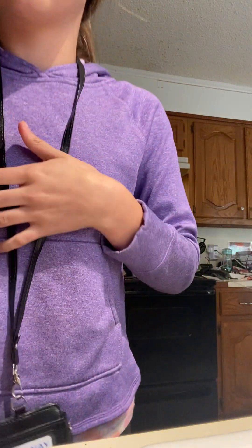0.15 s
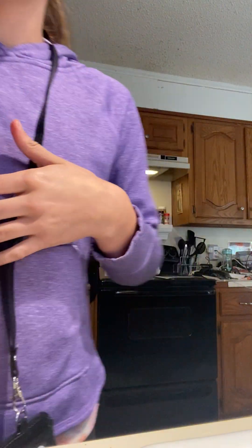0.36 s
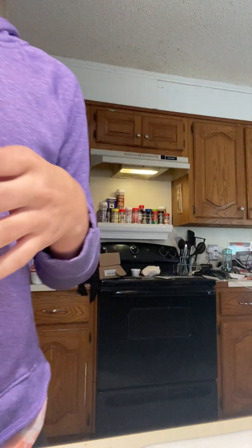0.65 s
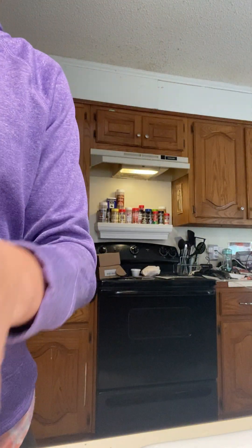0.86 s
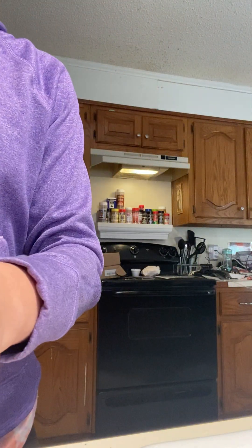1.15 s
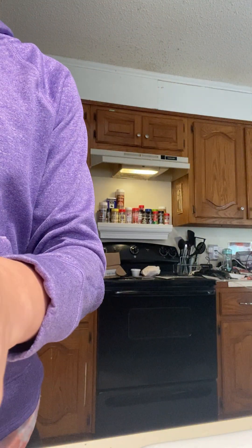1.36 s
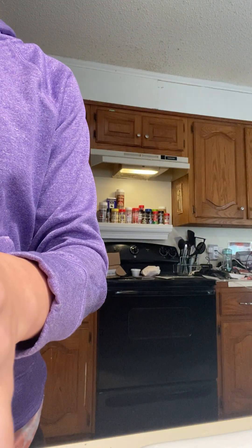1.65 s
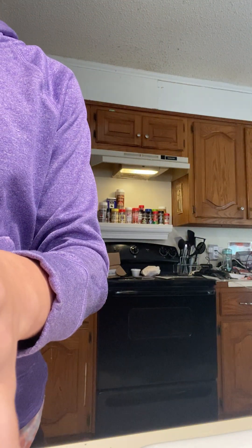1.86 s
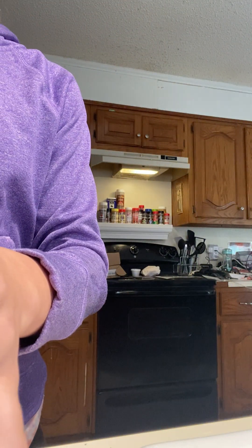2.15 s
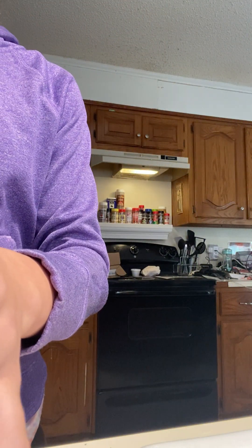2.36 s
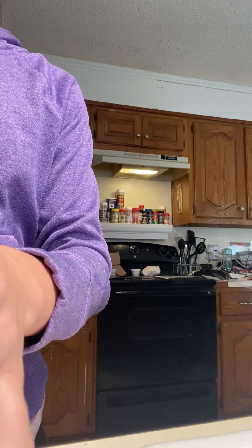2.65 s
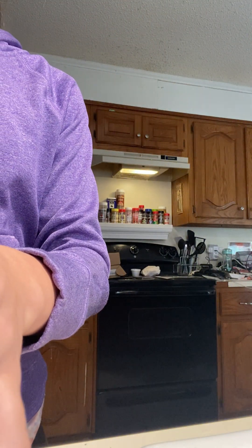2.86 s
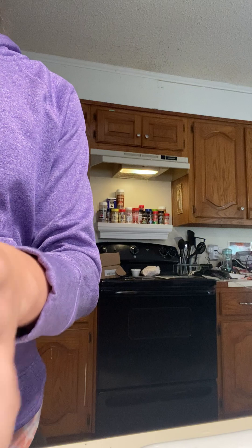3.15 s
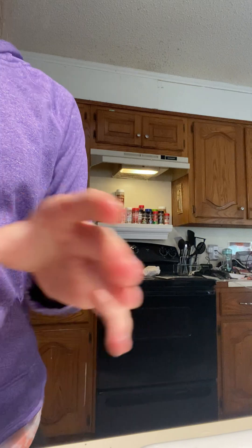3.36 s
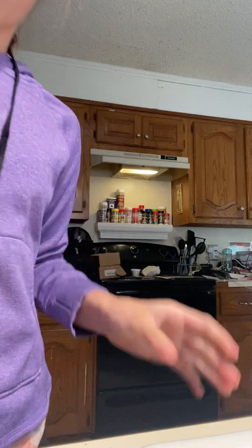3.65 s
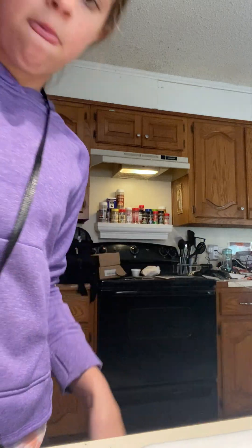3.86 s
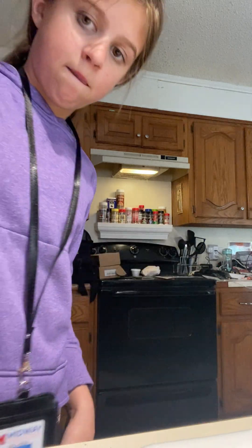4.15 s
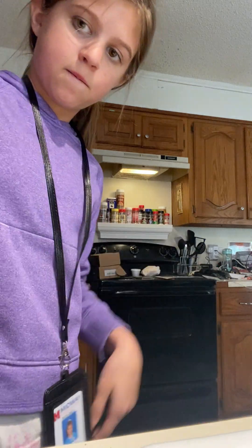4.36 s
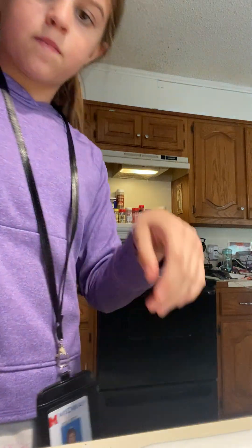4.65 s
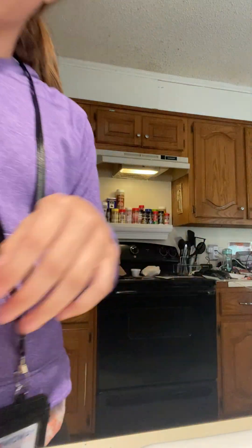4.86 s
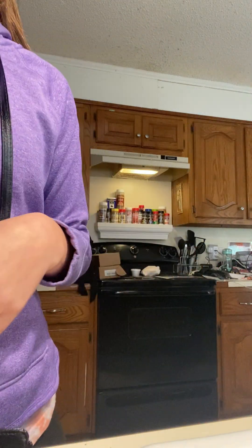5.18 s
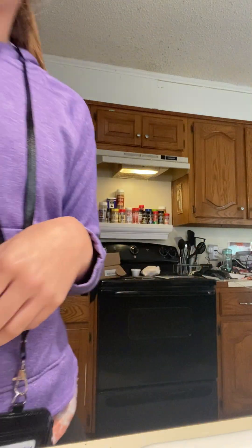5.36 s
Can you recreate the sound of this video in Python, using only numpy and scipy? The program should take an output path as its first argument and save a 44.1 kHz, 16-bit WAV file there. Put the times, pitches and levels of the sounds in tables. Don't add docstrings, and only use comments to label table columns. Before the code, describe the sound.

Close, uneven bursts of ice knocking and ringing against a glass, with hollow thuds, counter thumps and a faint appliance hum behind.

```python
import sys
import numpy as np
from scipy import signal
from scipy.fft import rfft, irfft, next_fast_len
from scipy.io import wavfile
from scipy.ndimage import uniform_filter1d

SR = 44100
rng = np.random.default_rng(int(sys.argv[2]) if len(sys.argv) > 2 else 0)


def voltage_ratio(decibels):
    exponent = np.asarray(decibels, float) / 20
    return 10 ** exponent


def waveform_to_disk(signal):
    frames = np.transpose(np.atleast_2d(signal))
    scaled = np.clip(frames, -1, 1) * 32767
    samples = np.round(scaled).astype(np.int16)
    wavfile.write(sys.argv[1], SR, samples)


N = 243299

# t/s, peak level/dB, f/Hz
KNOCKS = [(0.2143, -31, 1810), (0.5003, -26, 2120), (0.5320, -15.5, 2290), (0.7317, -27.5, 1760),
          (0.7636, -8, 2450), (0.9702, -8.5, 2270), (0.9856, -10.5, 2310), (1.0187, -17.5, 2560),
          (1.0873, -18, 2460), (1.1453, -24, 1790), (1.2208, -13, 2530), (1.518, -28, 2100),
          (1.5405, -18.5, 2164), (1.8298, -32, 3170), (1.9721, -18.5, 2060), (2.5225, -21.5, 3040),
          (2.7636, -20.5, 2590), (2.83, -23.5, 2160), (3.008, -32, 2480), (3.0357, -27, 2520),
          (3.437, -37.5, 2260), (3.5771, -18, 1780), (3.6372, -22.5, 2160), (3.6994, -6.5, 2546),
          (3.8175, -14.5, 2250), (3.8638, -15.5, 3010), (3.8907, -14, 2725), (4.0153, -24.5, 1920),
          (5.0804, -19.5, 2025), (5.236, -38, 2400)]
# t/s, peak level/dB
TAPS = [(0.4946, -25), (0.5834, -34.5), (0.7412, -25.5), (0.8041, -18), (0.85, -28), (0.9094, -30),
        (0.955, -13.5), (0.997, -25.5), (1.0254, -22.5), (1.0524, -16), (1.1104, -22.5), (1.1859, -20),
        (1.4767, -17.5), (1.4985, -25), (1.7287, -36), (1.766, -31.5), (1.9491, -16.5), (2.5448, -17),
        (2.5704, -15), (2.7132, -21.5), (2.736, -9.5), (3.0645, -17.5), (3.12, -32), (3.1763, -32.5),
        (3.31, -32), (3.3615, -25.5), (3.5762, -9), (4.0473, -12.5), (4.2158, -32.5), (5.058, -21.5)]
# t/s, belly ring level/dB, rim ring level/dB, chip level/dB
CLINKS = [(0.4071, -29, -10.5, -26), (0.466, -37.5, -22, -29), (0.7382, -44.5, -33, -37.5),
          (0.948, -25, -49.5, -24), (0.9665, -20.5, -26.5, -37), (1.0495, -37.5, -51.5, -36.5),
          (1.1206, -25, -31.5, -40.5), (1.4528, -60, -38, -28.5), (1.8269, -56, -40, -28),
          (1.907, -44, -44, -41), (1.972, -40, -62.5, -18.5), (2.3095, -67.5, -37, -16),
          (2.362, -36.5, -37.5, -23), (2.522, -34, -37, -21), (2.7044, -52.5, -34, -30),
          (2.9975, -34, -13.5, -28.5), (3.0621, -26, -20.5, -43), (3.3341, -50.5, -66.5, -29),
          (3.403, -61.5, -56, -30), (3.5645, -71, -20, -14.5), (3.701, -55, -51.5, -27),
          (3.8176, -36.5, -57, -36.5), (3.9082, -55, -41, -26), (4.0222, -58, -24.5, -41.5),
          (4.049, -54, -33.5, -30), (4.7155, -38, -23, -34), (5.0951, -33, -18.5, -24),
          (5.2278, -42, -28, -24), (5.3439, -27, -23.5, -21), (5.4277, -34, -24.5, -25.5)]
# t/s, crunch level/dB, hollow level/dB, counter level/dB, length/s
TUMBLES = [(0.396, -41.5, -40.5, -41.5, 0.035), (0.484, -38, -34.5, -34, 0.072),
           (0.532, -38.5, -27.5, -39, 0.027), (0.721, -32, -23, -30, 0.056),
           (0.899, -35, -20.5, -33, 0.053), (0.955, -22, -12, -28, 0.022),
           (1.032, -35, -27.5, -46.5, 0.041), (1.088, -28, -14, -47.5, 0.0055),
           (1.104, -34, -25, -35.5, 0.055), (1.173, -35, -22, -57, 0.06), (1.206, -45.5, -35.5, -41, 0.084),
           (1.4345, -35, -28.5, -40, 0.1), (1.482, -48.5, -20, -55.5, 0.064),
           (1.922, -39.5, -28, -44.5, 0.012), (1.939, -25.5, -17.5, -33.5, 0.033),
           (2.308, -29, -30.5, -40.5, 0.016), (2.508, -28, -19.5, -31.5, 0.049),
           (2.7123, -27.5, -25, -44, 0.043), (3.059, -30.5, -22.5, -35.5, 0.056),
           (3.546, -47, -34.5, -45.5, 0.015), (3.561, -30, -17.5, -29, 0.037),
           (3.613, -39.5, -28, -33, 0.054), (3.8846, -34, -22.5, -44, 0.0077),
           (4.0118, -34.5, -30, -68, 0.0071), (5.052, -32, -28.5, -35, 0.025),
           (5.35, -32, -33.5, -42, 0.017)]
# f/Hz, level/dB
CRUNCH = [(800, -9), (1500, -18.5), (3000, -13), (5000, -5.5), (7000, -16), (10500, -16), (12500, -18.5),
          (15500, -27), (17000, -63.5)]

WALL_HZ = 2290
GRIPPED_S, GRIP_DB = 2.2, -13


def unit(x):
    return x / np.sqrt(np.mean(x ** 2) + 1e-20)


def along(points, hz):
    f, v = np.transpose(points)
    return np.interp(np.log(hz + 1), np.log(f + 1), v)


def filtered(x, response):
    m = next_fast_len(N + SR // 2)
    return irfft(rfft(x, m) * response(np.fft.rfftfreq(m, 1 / SR)), m)[..., :N]


def resonances(modes):
    def response(f):
        total = 0
        for k, (centre, width, db) in enumerate(modes):
            loss = 1j * f * width
            total = total + (-1) ** k * voltage_ratio(db) * loss / (centre * centre - f * f + loss)
        return total
    return response


def blank(seconds_part):
    return np.zeros(N + SR), np.arange(SR // seconds_part) / SR


def add(out, s, sound):
    out[round(s * SR):][:len(sound)] += sound


def ring(hz, db, t60, rise, t):
    return voltage_ratio(db - 60 * t / t60) * np.sin(2 * np.pi * hz * t) * (1 - np.exp(-t / rise))


def chippings():
    # t/s, peak level/dB
    cracked = [(0.2154, -34), (0.2875, -46.5), (0.4013, -32), (0.4988, -21.5), (1.407, -46), (0.5835, -38),
               (0.7726, -35), (0.85, -38.5), (0.91, -43.5), (1.1, -26.5), (1.1505, -33), (1.0904, -30.5),
               (1.4451, -32), (1.5439, -31.5), (1.9, -36.5), (1.9285, -31), (1.9435, -29), (2.2895, -44),
               (3.3, -33), (2.6105, -29), (1.2, -34), (4.525, -60.5), (3.26, -50), (2.875, -53.5),
               (3, -26.5), (3.0914, -15), (3.081, -26.5), (1.640, -54), (1.652, -46), (4.30, -58),
               (4.43, -63), (1.516, -31), (1.372, -49), (3.4348, -40.5), (3.683, -32.5), (5.0609, -26.5)]
    return cracked + [(s, chip_db) for s, _, _, chip_db in CLINKS]


def knocks():
    # t/s, peak level/dB, f/Hz
    nicks = [(0.4025, -36, 2150), (0.4105, -32, 2180), (0.4648, -40.5, 2170), (0.8829, -33, 1640),
             (0.9484, -8, 2310), (1.2999, -31.5, 2260), (1.3872, -36, 2350), (1.4524, -19.5, 2370),
             (1.7499, -32, 2330), (1.8622, -34, 2330), (1.9046, -38, 2570), (1.9284, -28.5, 2140),
             (2.3096, -25, 2210), (2.3444, -31, 1390), (2.379, -33, 2310), (2.4977, -28.5, 2350),
             (2.5326, -17.5, 2290), (2.6304, -22, 1350), (2.8784, -32.5, 2160), (3.014, -36, 2490),
             (3.1617, -27, 2210), (3.3318, -27.5, 3400), (3.4047, -37, 2290), (3.5528, -27, 2290),
             (3.6114, -23, 2300), (3.6621, -26, 2280), (3.7424, -35.5, 2200), (3.9609, -38.5, 2960),
             (4.4064, -42.5, 2297), (4.4199, -40.5, 1300), (5.1307, -30.5, 1920), (5.1701, -33, 2900),
             (5.23, -30, 2350), (5.2464, -45, 2520), (5.3448, -29, 2180), (5.4251, -26, 2310)]
    snap_db = -8
    blows = KNOCKS + [(s, db, WALL_HZ) for s, db in TAPS]
    blows = blows + [(s, db - 11, WALL_HZ) for s, db in chippings()]
    blows = blows + [(s, db - 5.5, hz) for s, db, hz in nicks]
    neighbours = [(.75, -2, .012), (1.02, -19, .035), (1.18, -3, .012), (1.36, -6, .009)]  # ratio, dB, t60 s
    out, t = blank(16)
    for (s, db, hz), luck in zip(blows, rng.standard_normal((len(blows), 4))):
        life = 0.87 ** (s > GRIPPED_S)
        add(out, s, ring(hz, db + 1.0, 0.017 * life, 0.00036, t))
        add(out, s, ring(1.9 * hz, db + snap_db, 0.0019, 0.000081, t))
        add(out, s, ring(.55 * hz, db + snap_db, 0.015, 0.00068, t))
        for (ratio, side_db, t60), u in zip(neighbours, luck):
            add(out, s, ring(hz * ratio * (1 + 0.11 * u), db + side_db, t60, 0.00055, t))
    return out[:N]


def taps():
    after_rings = [(s, db - 0.026 * abs(hz - WALL_HZ)) for s, db, hz in KNOCKS]
    out, t = blank(6)
    for s, db in after_rings + TAPS:
        add(out, s, ring(WALL_HZ, db - 9.5 + GRIP_DB * (s > GRIPPED_S), 0.058, 0.0011, t))
    return out[:N]


def flutter(size, depth):
    slow = uniform_filter1d(rng.standard_normal(size), size=180)
    return 1 + depth * unit(uniform_filter1d(slow, size=180))


def wall(blows, modes, linger_db):
    out, t = blank(5)
    touches = np.sort([row[0] for row in KNOCKS + TAPS])
    fade = np.cos(np.pi / 2 * t / t[-1])
    for (s, blow_db), luck in zip(blows, rng.standard_normal((len(blows), len(modes)))):
        swing_db = 5 * luck * (np.arange(len(modes)) > 0)
        touched = np.searchsorted(touches, s + t) - np.searchsorted(touches, s + 0.013)
        damping = voltage_ratio(-6.5 * uniform_filter1d(np.maximum(touched, 0.), size=200))
        waver = flutter(len(t), depth=.22)
        slow_db = blow_db + linger_db + GRIP_DB * (s > GRIPPED_S)
        add(out, s, waver * damping ** .1 * fade * ring(modes[0][0], slow_db, 0.24, 0.0052, t))
        life = np.exp(0.22 * luck[0])
        family = sum(ring(hz, blow_db + db + v, life * t60, 0.00091, t)
                     for (hz, db, t60), v in zip(modes, swing_db))
        add(out, s, damping * waver * family)
    return out[:N]


def belly_ring():
    # f/Hz, level/dB, t60/s
    belly_modes = [(5245, 0, .078), (5272, -9, .1), (5330, -12, .04), (4950, -13, .03), (4230, -11, .04),
                   (4080, -14, .03), (2620, -14, .04), (2210, -14, .04), (3590, -20, .04),
                   (2400, -16, .045)]
    clinked = [(s, db) for s, db, _, _ in CLINKS]
    grazed = [(s, db - 32) for s, db, *_ in TAPS + KNOCKS]
    return wall(clinked + grazed, belly_modes, linger_db=-9)


def rim_ring():
    # f/Hz, level/dB, t60/s
    rim_modes = [(9228, 0, .062), (9259, -7, .08), (9040, -12, .025), (14400, -20, .04), (6150, -20, .025),
                 (6350, -19, .04), (7000, -24, .03), (7750, -21, .04), (10500, -22, .04)]
    rebound_s, rebound_db = 0.0055, -1.5
    blows = [(s + k * rebound_s, db - 8 + k * rebound_db) for s, _, db, _ in CLINKS for k in range(2)]
    return wall(blows, rim_modes, linger_db=-16)


def pings():
    # t/s, peak level/dB, f/Hz
    facets = [(0.401, -28, 6000), (0.4993, -25, 5880), (0.5312, -34, 5570), (0.5454, -32.5, 5700),
              (0.7384, -28, 5400), (0.7704, -24, 5680), (0.9093, -42, 5800), (0.953, -15, 5400),
              (0.9687, -15, 5710), (1.0256, -26, 6030), (1.05, -21, 5600), (1.1221, -21.5, 5470),
              (1.4451, -36, 7600), (1.4541, -28, 5850), (1.5434, -28.5, 6000), (1.7634, -35, 6400),
              (1.8282, -31, 6160), (2.31, -22, 7020), (2.3214, -20, 6320), (2.3585, -25, 6000),
              (2.5197, -24, 5730), (2.7122, -31, 5920), (2.9975, -26, 6200), (3.0629, -30, 6090),
              (3.0916, -22, 5900), (3.1044, -19.5, 6310), (3.3318, -29, 5980), (3.4037, -31.5, 5420),
              (3.4348, -30, 4260), (3.5643, -22.5, 6630), (3.5774, -21.5, 5750), (3.6174, -27, 7100),
              (3.685, -35, 5770), (3.6985, -23.5, 5750), (3.8174, -29, 5870), (4.0228, -30.5, 6020),
              (4.0467, -31, 7780), (5.0609, -32.5, 6430), (5.2265, -28.5, 6240), (5.3446, -21.5, 5560),
              (5.424, -27.5, 7700)]
    out, t = blank(16)
    for s, db, hz in facets:
        add(out, s, ring(hz, db - 5, .02, 0.00024, t) + ring(1.07 * hz, db - 9, .02, .0006, t))
    return out[:N]


def sings():
    # t/s, level/dB, f/Hz, t60/s
    lone_modes = [(.403, -35, 2227, 0.089), (0.441, -42, 2290, 0.21), (.505, -26.5, 2290, 0.1),
                  (0.534, -27, 1510, 0.024), (.733, -23.5, 190, 0.14), (3.702, -28, 1360, 0.04),
                  (.805, -38.5, 5250, 0.096), (.856, -47.5, 5245, 0.14), (.935, -23, 2290, 0.057),
                  (0.973, -25, 1370, .04), (.985, -32, 9230, 0.05), (1.075, -31, 5245, 0.051),
                  (1.093, -32.5, 9230, 0.031), (1.226, -42, 5245, 0.13), (1.224, -13.5, 2494, 0.046),
                  (2.552, -37.5, 5250, 0.056), (3.005, -37, 5190, 0.17), (3.031, -29, 2500, .06),
                  (3.613, -28.5, 2310, 0.077), (3.703, -40, 5200, 0.071), (5.231, -32.5, 2368, 0.056),
                  (5.247, -40, 2570, 0.037), (.532, -18, 2324, 0.047), (.52, -44.5, 9230, 0.2),
                  (.954, -20, 2290, .05), (.970, -24, 2290, 0.044), (1.862, -50.5, 5260, 0.081),
                  (2.731, -16, 2327, 0.034), (2.999, -33.5, 2210, 0.07), (3.745, -29.5, 120, 0.066),
                  (3.570, -8, 2300, 0.014), (2.320, -23, 2200, 0.016)]
    out, t = blank(5)
    for s, db, hz, t60 in lone_modes:
        add(out, s, ring(hz, db + 1.5, t60, 0.0018, t))
    return out[:N]


def cracks():
    out, t = np.zeros((2, N + SR)), np.arange(SR // 16) / SR
    t60 = np.array([[0.043], [.022]])
    for s, db in chippings():
        puff = voltage_ratio(db + 6.5 - 60 * t / t60) * rng.standard_normal(len(t))
        add(out.T, s, puff.T)

    def colour(f):
        split = np.array([1 / (1 + (f / 15000) ** 6), (f / 15000) ** 4])
        return voltage_ratio(along(CRUNCH, f)) * f ** 2 / (f ** 2 + 3500 ** 2) * split
    return filtered(out[:, :N], colour).sum(axis=0)


def thuds():
    # t/s, peak level/dB, f/Hz
    base_blows = [(0.214, -34.5, 516), (0.53, -28, 541), (0.765, -21, 567), (0.851, -25, 782),
                  (0.929, -18, 676), (0.947, -12.5, 798), (0.978, -7, 931), (1.091, -27, 693),
                  (1.128, -32, 585), (1.189, -22, 676), (1.22, -16, 853), (1.447, -23, 573),
                  (1.501, -24, 620), (1.53, -49, 547), (1.554, -18, 586), (1.774, -23, 663),
                  (1.95, -16.5, 575), (2.534, -30, 495), (2.576, -23.5, 785), (2.737, -20, 599),
                  (3.065, -16.5, 559), (3.177, -23.5, 582), (3.312, -28.5, 667), (3.578, -14, 571.4),
                  (3.625, -20.5, 601), (3.699, -26, 593), (3.89, -21.5, 795), (4.016, -30.5, 808),
                  (5.066, -25.5, 613), (5.37, -25, 552)]
    # t/s, peak level/dB, f/Hz
    softer_base_blows = [(0.741, -25.5, 556), (0.911, -23, 750), (0.934, -16, 780), (1.099, -22, 703),
                         (2.344, -30.5, 1240), (2.514, -22, 712), (2.629, -34.5, 708), (2.764, -14, 576),
                         (3.089, -12, 570), (3.119, -24.5, 656), (3.163, -22, 569), (3.36, -28, 817),
                         (3.593, -19.5, 572), (3.665, -26.5, 687), (5.081, -20.5, 797)]
    softer = [(s, db - 8, hz) for s, db, hz in softer_base_blows]
    landings = [(s + .012, db - 12, 617) for s, _, db, _, _ in TUMBLES]
    out, t = blank(8)
    for s, db, hz in base_blows + softer + landings:
        add(out, s, ring(hz, db + 5.0, 0.047, 0.006, t) + ring(1.4 * hz, db + 3.5, 0.022, 0.0023, t))
    return out[:N]


def burst_gains():
    # t/s, crunch level/dB, hollow level/dB, length/s
    settlings = [(0.278, -61, -38.5, 0.032), (0.785, -32.5, -46.5, 0.012), (0.831, -43, -28.5, 0.03),
                 (1.341, -55.5, -42.5, 0.089), (1.632, -56, -54, 0.027), (1.716, -53.5, -38.5, 0.04),
                 (1.758, -31.5, -24, 0.0091), (1.802, -50, -45, 0.059), (2.166, -65.5, -57, 0.046),
                 (2.353, -46.5, -46, 0.026), (2.607, -45, -35, 0.02), (2.759, -48.5, -46.5, 0.087),
                 (3, -45, -46, 0.059), (3.153, -40.5, -23, 0.014), (3.192, -62.5, -55, 0.068),
                 (3.322, -45, -36, 0.039), (3.349, -51.5, -59.5, 0.014), (3.674, -40, -29, 0.054),
                 (3.765, -52.5, -64, 0.015), (3.798, -49, -34, 0.074), (4.283, -72, -44.5, 0.016),
                 (4.406, -53, -45, 0.016), (5.166, -53.5, -62, 0.04), (5.203, -48.5, -42.5, 0.024)]
    bursts = TUMBLES + [(s, c, h, h - 17, d) for s, c, h, d in settlings]
    gains, t = np.zeros((3, N + SR)), np.arange(SR // 3) / SR
    start = 1 - np.exp(-t / np.array([[.004], [.008], [.015]]))
    t60 = np.array([[.07], [.15], [.25]])
    for s, crunch_db, hollow_db, counter_db, length in bursts:
        after = np.maximum(t - length, 0)
        level_db = np.array([[crunch_db], [hollow_db], [counter_db]]) - 60 * after / t60
        add(gains.T, s, ((voltage_ratio(level_db) * start) ** 2).T)
    return np.sqrt(gains[:, :N])


def gravel(per_s, spread_db, wet):
    struck = rng.random(N) < per_s / SR
    hits = struck * voltage_ratio(spread_db * rng.standard_normal(N)) * np.sign(rng.standard_normal(N))
    return unit(hits) + wet * rng.standard_normal(N)


def splinters(count, cycles, spread_db):
    u, t = rng.random((count, 2)), np.arange(256)
    step = 2 * np.pi * 1000 * 16 ** u[:, :1] / SR
    decay_db = 60 * t * step / (2 * np.pi * cycles)
    rows = voltage_ratio(spread_db * rng.standard_normal((count, 1)) - decay_db) * np.sin(step * t) * step
    places = (u[:, 1:] * N).astype(int) + t
    return unit(np.bincount(places.ravel(), rows.ravel(), N + 256)[:N])


def grinding():
    # f/Hz, width/Hz, level/dB
    cube_modes = [(1540, 480, -15.5), (2120, 560, 0.5), (2310, 29, 9), (2530, 44, -4), (2910, 560, -1),
                  (5130, 9.9, -5.5), (9230, 20, -4.5)]
    # f/Hz, width/Hz, level/dB
    hollow_modes = [(572.5, 27, 0), (700.8, 28, -1), (822, 44, -8), (927, 65, -7.5), (1240, 340, -8.5)]
    # f/Hz, width/Hz, level/dB
    counter_modes = [(58.5, 12, 1), (86, 20, 2.5), (187.5, 37, 0), (286.2, 13, -1.5), (333.6, 4.9, -1.5)]
    crunch, hollow, counter = burst_gains()
    chips = splinters(count=16000, cycles=30, spread_db=4.5) + 0.5 * rng.standard_normal(N)
    grit = gravel(per_s=700, spread_db=4.5, wet=.45)
    bite = np.abs(uniform_filter1d(grit ** 2, size=160)) ** 0.36
    bright = voltage_ratio(-9.5) * unit(bite * filtered(chips, lambda f: voltage_ratio(along(CRUNCH, f))))
    cubes = voltage_ratio(4.0) * filtered(crunch * grit, resonances(cube_modes))

    def hollow_tone(f):
        return resonances(hollow_modes)(f) / (1 + 1j * f / 1500) ** 2
    slosh = np.array([gravel(per_s=400, spread_db=3.5, wet=.5) for _ in range(2)])
    dull, unlike = unit(filtered(slosh, hollow_tone))
    boom = unit(filtered(gravel(per_s=120, spread_db=3.0, wet=0.31), resonances(counter_modes)))
    grind = crunch * bright + cubes + voltage_ratio(-10.0) * hollow * dull
    return grind, voltage_ratio(-2.0) * counter * boom, voltage_ratio(-14.5) * hollow * unlike


def thumps():
    out, t = blank(4)
    for s, _, _, db, _ in TUMBLES:
        add(out, s + .015, ring(189, db - 1, 0.15, 0.0064, t))
    return out[:N]


def sleeve():
    # t/s, level/dB, length/s
    strokes = [
        (0.138, -69.5, 0.59),
        (4.368, -64, 0.082),
        (4.651, -64.5, 0.45),
        (5.16, -56, 0.062),
    ]
    # f/Hz, level/dB per Hz
    cloth = [(900, -1), (2500, -3), (6000, -10), (10000, -13), (12500, -39.5)]
    t, swell = np.arange(N) / SR, np.zeros(N)
    for s, db, length in strokes:
        stroke = np.sin(np.pi * np.clip((t - s) / length, 0, 1) ** 0.4)
        swell += voltage_ratio(db) * np.abs(stroke) ** 1.2
    return swell * unit(filtered(rng.standard_normal(N), lambda f: voltage_ratio(along(cloth, f))))


def middle(f):
    return 1 / (1 + (f / 5000) ** 6) / (1 + (160 / (f + 1)) ** 4)


def ports(x, lag_s):
    # f/Hz, lead/rad
    phase_lead = [(0, 0), (690, .1), (1120, -3), (1640, -8.9), (2150, -7.3), (2760, -8.7), (3360, -7.5),
                  (4220, -6.9), (7240, -6.5), (9130, -7.6), (10700, -8.1), (12300, -9.3), (16400, -9.5)]
    # f/Hz, left minus right level/dB
    side_lean = [(60, 1), (200, 4.5), (380, 8), (700, 6), (1290, 2), (2380, 6), (4400, 2.5), (8100, .5),
                 (11000, 0)]
    # t/s, left minus right level/dB
    place = [(0.0, -18), (0.18, 7.5), (2.7, 7), (3.8, 7), (4.15, 9), (4.41, 8.5), (5.52, 5.5)]

    def half(f):
        lead = np.interp(f, *np.transpose(phase_lead)) + 2 * np.pi * f * lag_s * middle(f)
        return voltage_ratio(along(side_lean, f) / 2) * np.exp(.5j * lead)
    pair = filtered(x, lambda f: np.array([half(f), 1 / half(f)]))
    pan_db = np.interp(np.arange(N) / SR, *np.transpose(place)) - 5
    shift = voltage_ratio(np.array([pan_db, -pan_db]) / 2) - 1
    return pair + filtered(pair, middle) * shift


def kitchen(x):
    # f/Hz, t60/s
    room_decay = [(200, 0.19), (1000, .3), (2400, 0.23), (5000, 0.24), (10000, 0.12), (13000, 0.06)]
    hz, t, z = signal.stft(rng.standard_normal((2, SR // 2)), SR, nperseg=256)
    z[1] = z[0] + middle(hz)[:, None] * (z[1] - z[0])
    decay = voltage_ratio(-60 * t / along(room_decay, hz)[:, None])
    tail = signal.istft(z * decay, SR, nperseg=256)[1]
    late = np.pad(x, (150, 0))[None]
    return signal.fftconvolve(late, tail / np.linalg.norm(tail[0]), axes=1)[:, :N]


def hum():
    # f/Hz, level/dB per Hz
    rumble = [(20, -21), (64, -8), (110, -14.5), (243, -21.5), (286, -15.5), (326, -28), (363, -15.5),
              (437, -18.5), (526, -14.5), (764, -26.5), (1500, -34.5), (2400, -39), (3600, -49.5),
              (10500, -56.5), (12500, -68.5), (14000, -100)]
    # f/Hz, correlation/1
    likeness = [(60, 0.98), (130, 1), (290, 0.21), (640, 0.26), (3000, 0.042)]

    def mid_side(f):
        turn = np.arccos(np.clip(along(likeness, f), -1, 1)) / 2
        return voltage_ratio(along(rumble, f)) * np.array([np.cos(turn), np.sin(turn)])
    mid, side = filtered(rng.standard_normal((2, N)), mid_side)
    line = voltage_ratio(-65.0) * np.sin(2 * np.pi * 360 * np.arange(N) / SR)
    return voltage_ratio(-54.5) * unit(np.array([mid + side, mid - side])) + line


def scene():
    grind, boom, unlike = grinding()
    glass = knocks() + taps() + belly_ring() + rim_ring() + pings() + sings() + thuds()
    chips = cracks()
    room = voltage_ratio(-15.0) * kitchen(glass + chips + grind) * voltage_ratio(np.array([[-1.5], [1.5]]))
    body = ports(glass + boom + thumps() + sleeve() + room, lag_s=0)
    mouth = ports(grind, lag_s=0.00012)
    mouth = mouth + ports(chips, lag_s=0.00025) * voltage_ratio(np.array([[1.6], [-1.6]]))
    return body + mouth + unlike * np.array([[1], [-1]]) + hum()


def low_pass(x):
    return signal.sosfilt(signal.butter(12, 16810, fs=SR, output="sos"), x)


def record(dry):
    return low_pass(dry)


dry = scene()
out = record(dry)
waveform_to_disk(out)
```